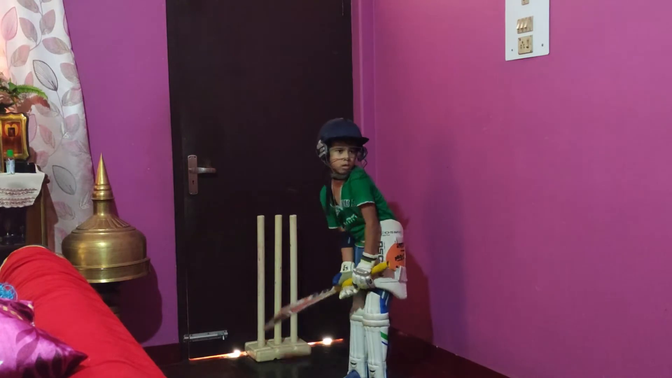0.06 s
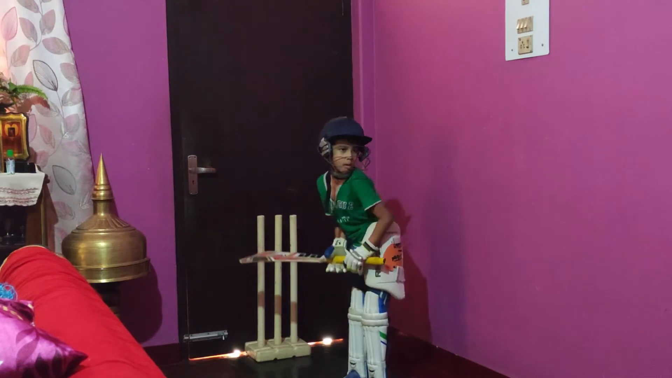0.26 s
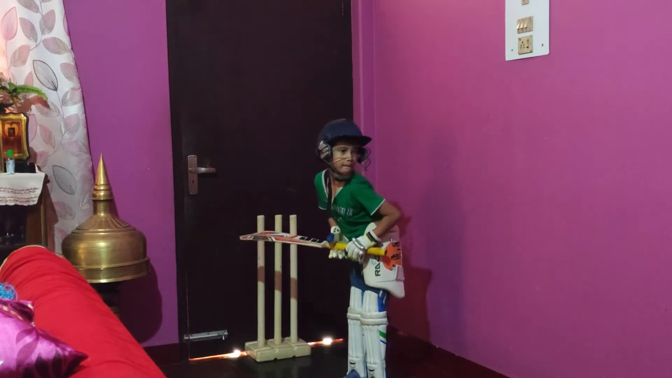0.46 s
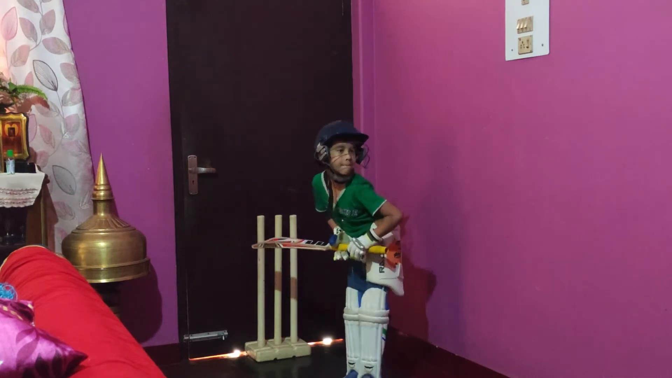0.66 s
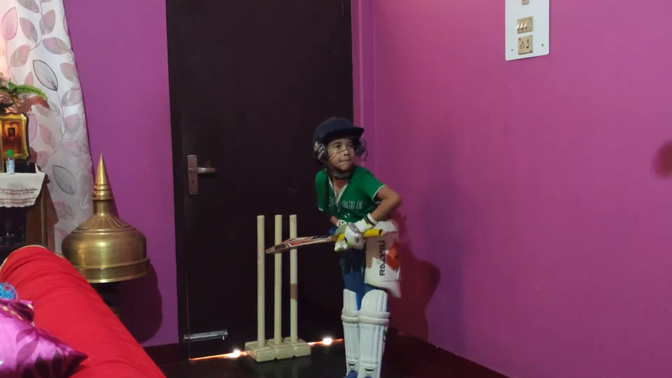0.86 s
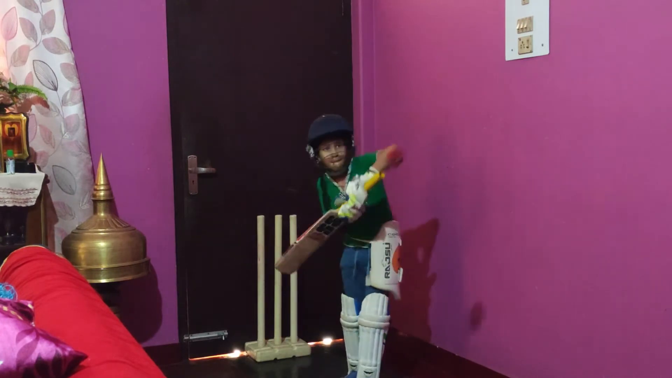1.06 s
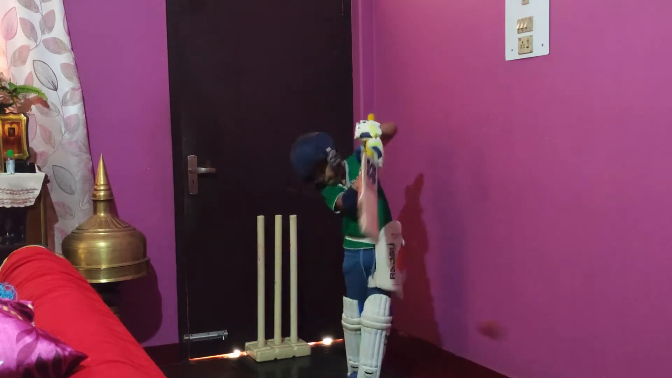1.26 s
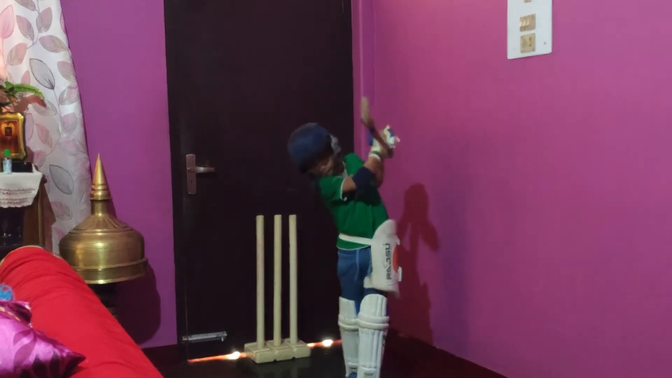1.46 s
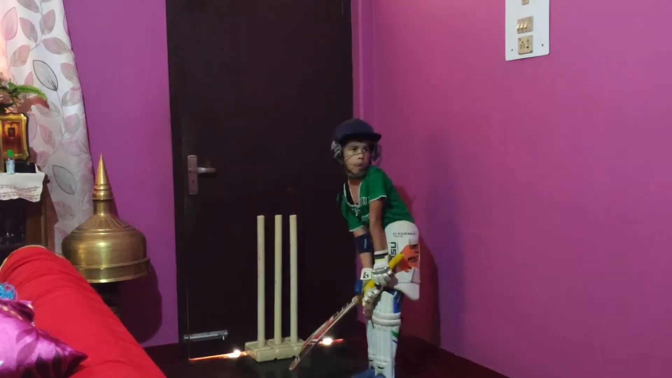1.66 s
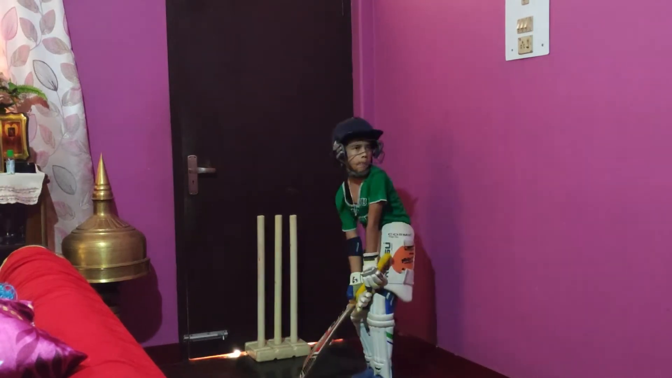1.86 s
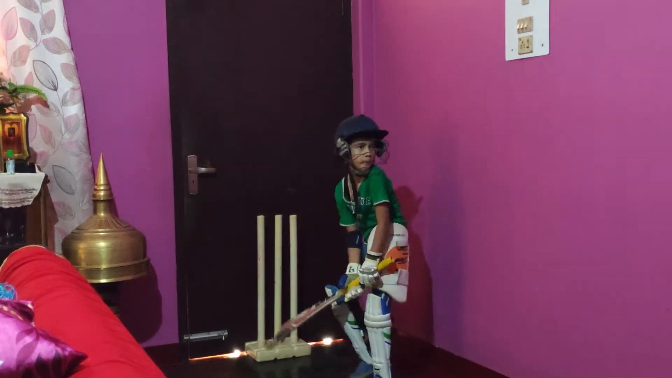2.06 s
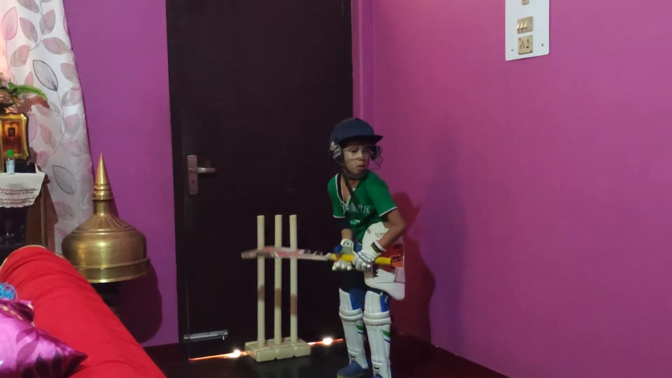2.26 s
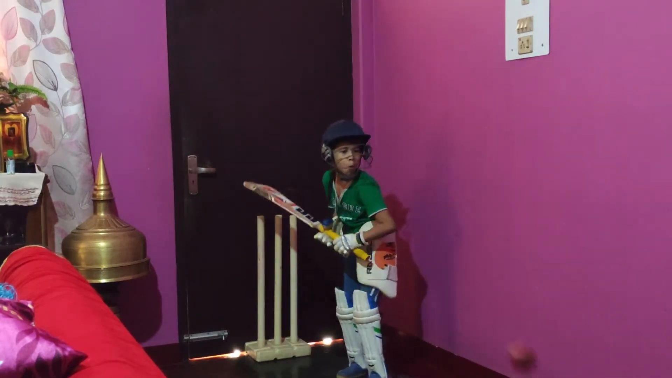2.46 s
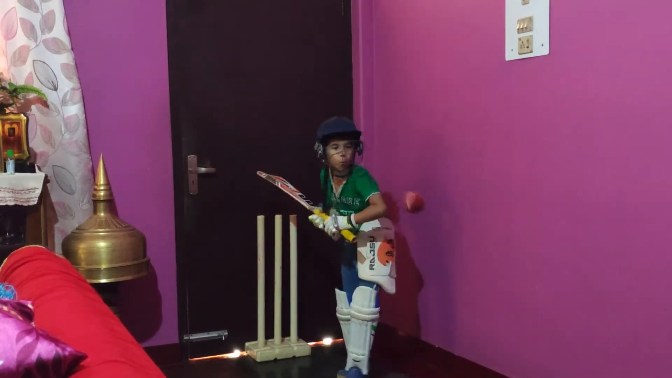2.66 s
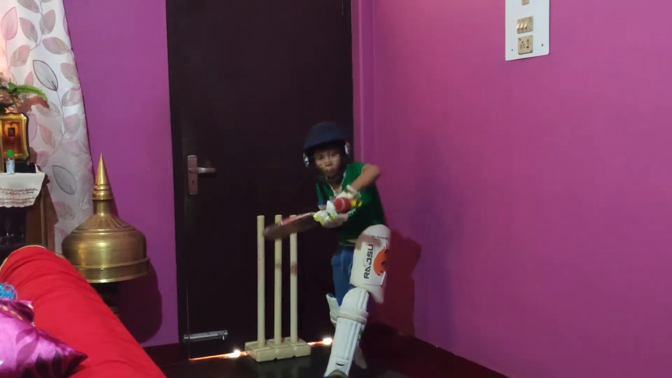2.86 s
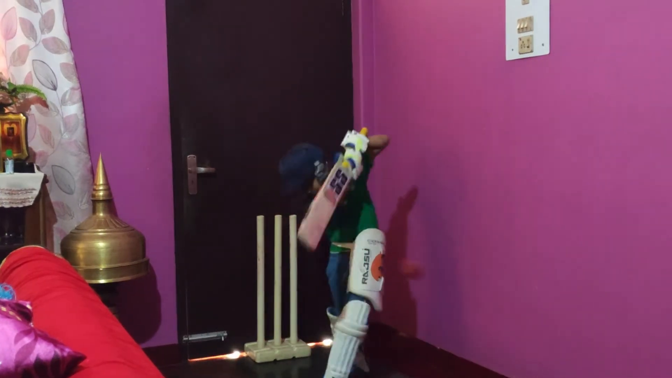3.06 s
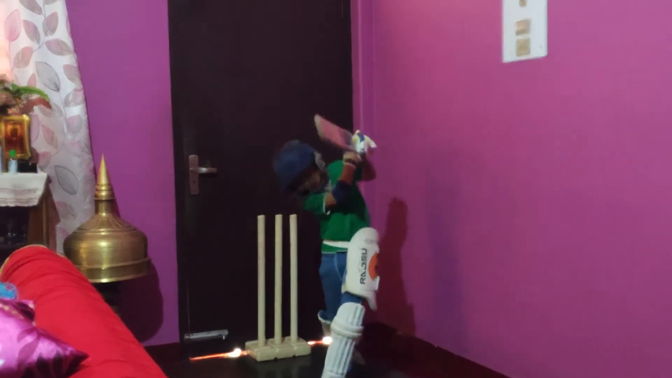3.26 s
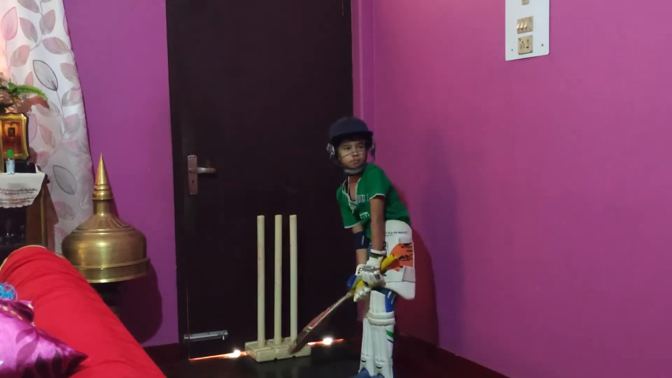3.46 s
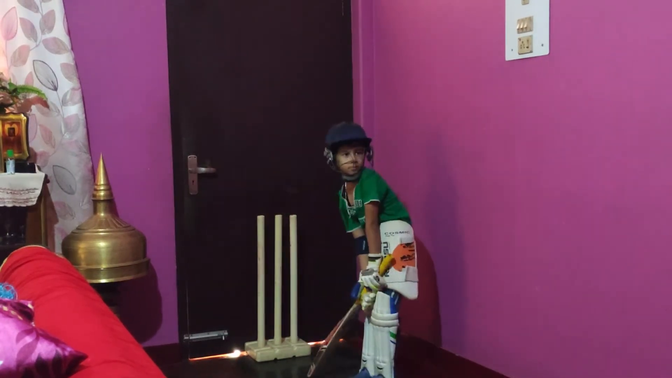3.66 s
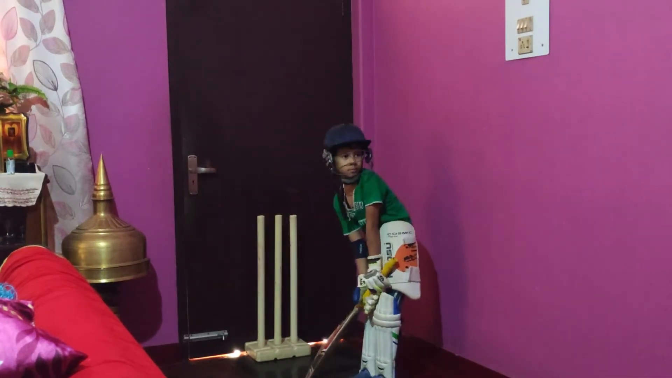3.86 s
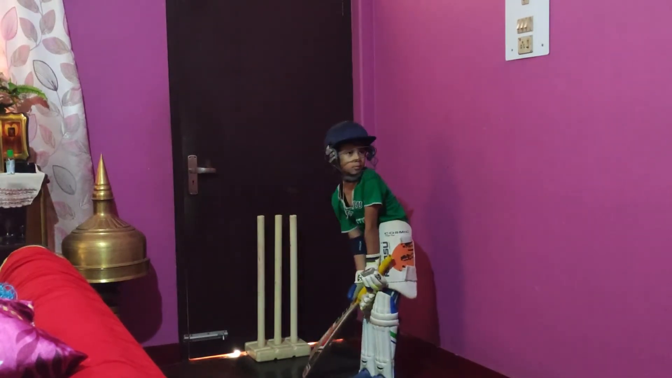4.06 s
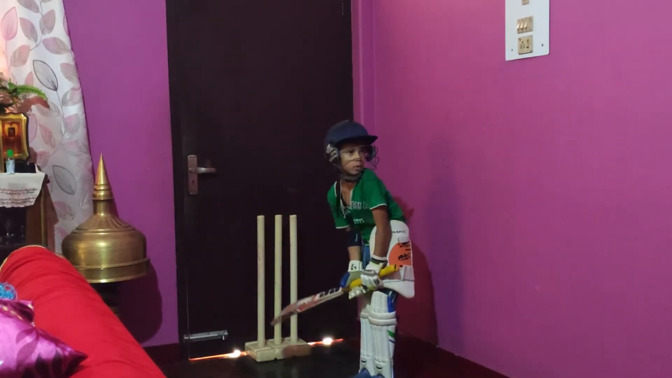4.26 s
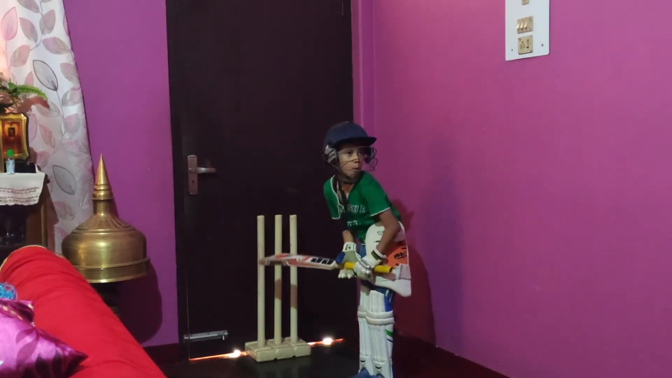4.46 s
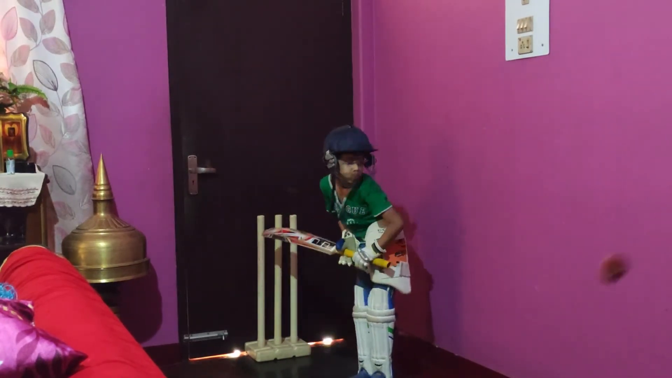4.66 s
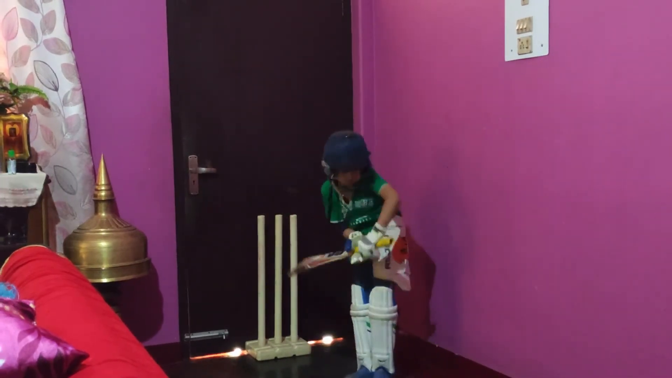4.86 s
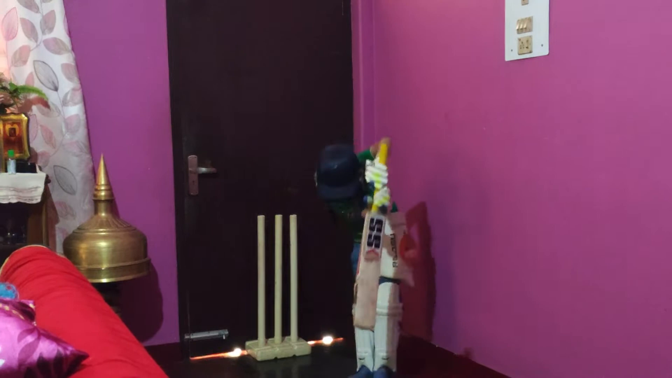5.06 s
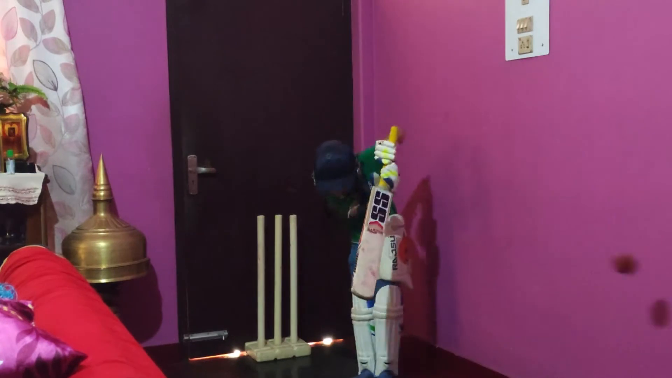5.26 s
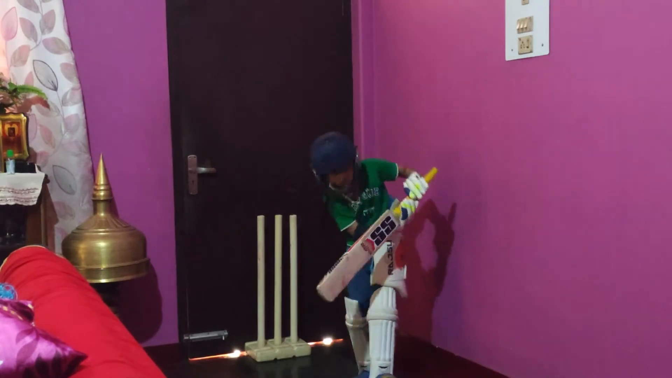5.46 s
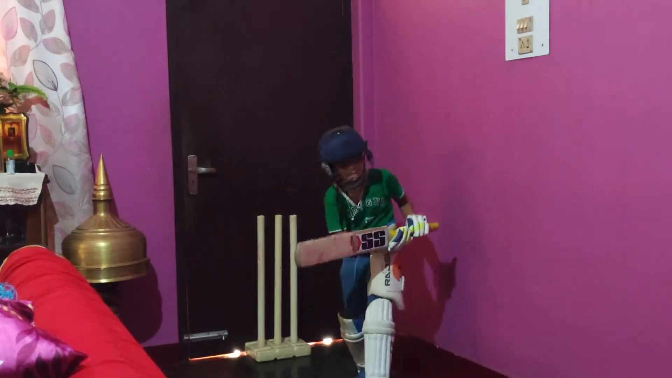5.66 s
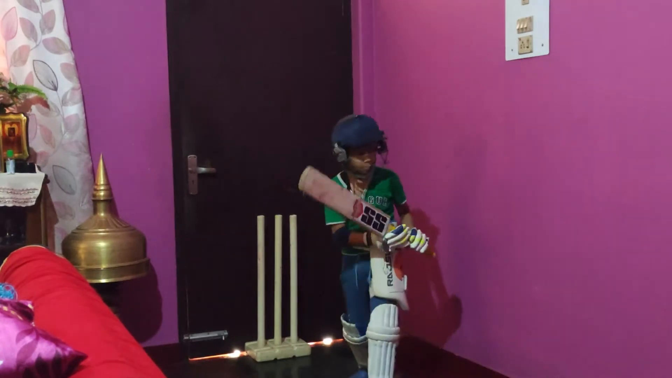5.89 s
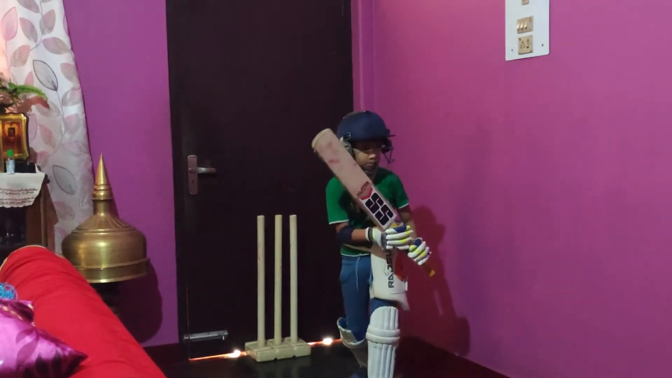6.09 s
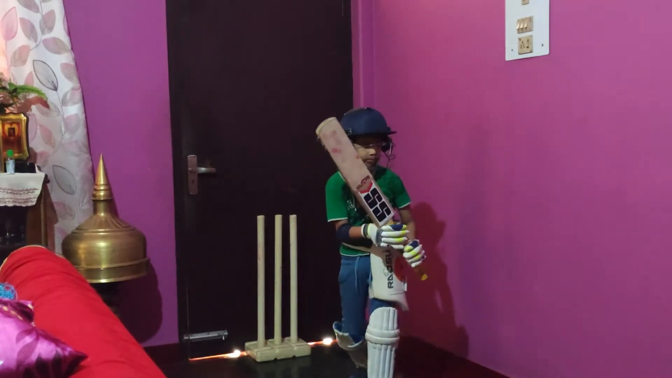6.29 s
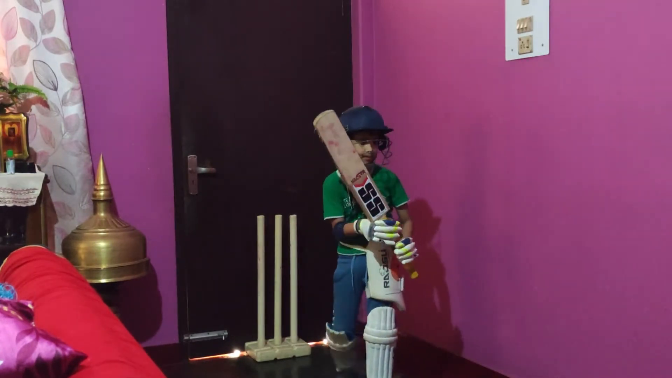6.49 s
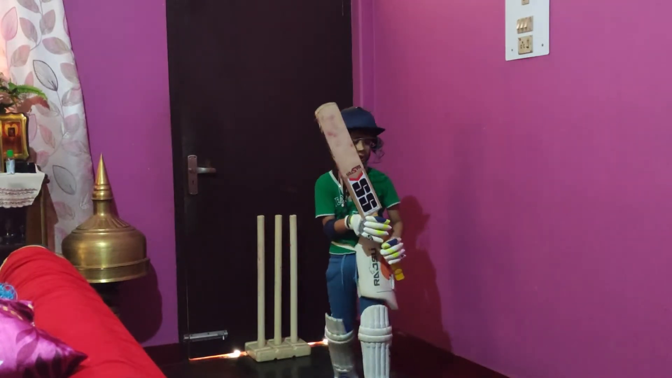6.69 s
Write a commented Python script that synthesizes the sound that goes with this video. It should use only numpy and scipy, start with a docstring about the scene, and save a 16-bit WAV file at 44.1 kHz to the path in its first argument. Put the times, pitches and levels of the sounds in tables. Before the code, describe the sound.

A small hard-walled room holds quiet, steady, low-weighted noise and a faint wavering hum. Clothes and pads rustle softly until a wooden bat cracks a ball sharply at 1.3 seconds, the loudest hit, ringing briefly with a short boxy echo. A tiny rasp of noise cuts off at 1.5, then the bat's toe knocks the floor firmly at 1.55 and more lightly at 1.9. A ball bounces at 2.4, and the second crack comes at 3.1. A faint gear tick precedes a hollow, chattering knock at 3.65 and a weaker one at 3.95. Another tick and a bounce at 4.9 lead to the third crack at 5.1, softer and fuller in bass. Pads rub hard as feet thud quickly around 5.55 to 5.6; a scuff at 5.95 and lighter steps near 6.1 follow. Faint rustling and a last scuff at 6.7 close it.

```python
"""A wooden bat cracks a ball three times in a small hard-walled room: shaped pulses ring the blade and room.
Thrown balls bounce; the toe of the bat knocks twice on the floor between strokes, its rebounds as a comb.
Feet land after the last stroke; light ticks of the gear use the same pulse model, without audible blade.
Clothes and pads rustle and soles scuff: noise with level envelopes. A brief burst of noise cuts off.
Below lie steady room noise and a low hum of two wavering sines."""
import sys
import numpy as np
from scipy import signal
from scipy.fft import rfft, irfft
from scipy.io import wavfile
from scipy.ndimage import uniform_filter1d

SR = 44100
rng = np.random.default_rng(int(sys.argv[2]) if len(sys.argv) > 2 else 0)


def store_pcm(level_fs):
    """Save levels as 16-bit WAV."""
    pcm = np.round(np.clip(level_fs, -1, 1) * 32767).astype(np.int16)
    wavfile.write(sys.argv[1], SR, np.atleast_2d(pcm).T)


N = 296793
TIME_S = np.arange(N) / SR
RESPONSE_SIZE = 65536  # samples
HZ = np.fft.rfftfreq(RESPONSE_SIZE, 1 / SR)
AGE_S = np.arange(RESPONSE_SIZE) / SR
SIDES = np.array([[.5], [-.5]])  # left, right: splits a left-minus-right difference
LEAD_S = 0.001  # margin ahead of the first path, so that a side can lead


def amp(db):
    """Decibels to amplitude gain."""
    return 10 ** (np.asarray(db) / 20)


def unit(x):
    """Scales to rms 1."""
    return x / np.sqrt(np.mean(x ** 2) + 1e-20)


def read(points, hz):
    """Interpolates a table on a log-frequency axis."""
    point_hz, value = np.transpose(points)
    return np.interp(np.log(hz + 1), np.log(point_hz + 1), value)


def add(mix, start_s, sound):
    """Mixes a stereo sound in at start_s, cut at the end of the mix."""
    part = mix[:, round(start_s * SR):][:, :sound.shape[1]]
    part += sound[:, :part.shape[1]]


def noise(colour, alike, size):
    """Stereo noise of rms 1; the mid/side balance at each frequency sets left-right likeness."""
    hz = np.fft.rfftfreq(size, 1 / SR)
    mid, side = rfft(rng.standard_normal((2, size)))
    likeness = np.clip(read(alike, hz), -1, 1)
    mid = mid * np.sqrt(1 + likeness)
    side = side * np.sqrt(1 - likeness)
    left_right = np.array([mid + side, mid - side])
    return unit(irfft(left_right * amp(read(colour, hz)), size))


def drift(top_hz):
    """Slow random wander of rms 1: ten sines at random rates up to top_hz."""
    rates_hz = top_hz * rng.uniform(0.074, 1, size=10)
    return unit(sum(np.sin(2 * np.pi * (hz * TIME_S + rng.random())) for hz in rates_hz))


# Colour of the room noise. Each row: frequency in Hz, relative spectral level in dB.
AIR_COLOUR = [(20, -2), (38, -8.5), (66, -9.5), (95, -15), (130, -10.5), (175, -2), (300, -8), (440, -14.5),
              (620, -10), (1500, -19), (3000, -28.5), (5200, -40), (7500, -34), (9500, -43), (15800, -45)]
# Likeness of the sides in room noise and rasp. Each row: frequency in Hz, correlation from -1 to 1.
AIR_ALIKE = [(50, 0.19), (120, 1), (290, .82), (640, 0.65), (1400, -0.038), (3100, -0.11), (6800, -0.051),
             (15000, 0.04)]
AIR_DB = -49.5  # rms


def room_noise():
    """Steady random noise with the colour of the room."""
    return amp(AIR_DB) * noise(AIR_COLOUR, AIR_ALIKE, N)


# Hum partials. Each row: frequency in Hz, rms level in dB about which it wavers.
HUM_PARTIALS = [(102.3, -58.5), (161.5, -64)]


def hum(waver_db=1.0, wander_rad=0.6):
    """Low sines, equal on both sides, whose level and phase wander at random."""
    total = np.zeros(N)
    for hz, db in HUM_PARTIALS:
        level = amp(db + waver_db * drift(9.0)) * np.sqrt(2)
        total += level * np.sin(2 * np.pi * hz * TIME_S + wander_rad * drift(2.0))
    return total


RISE_SHARE = 0.75  # a movement gathers in this share of its fall time


def swell(peak_s, level_db, attack_s, hold_s, release_s):
    """Power of one movement: exponential rise to peak_s, hold, exponential fall."""
    t = TIME_S - peak_s
    away = np.maximum(-t, 0) / attack_s + np.maximum(t - hold_s, 0) / release_s
    return (amp(level_db) * np.exp(-away)) ** 2


def movements(rows):
    """Summed power of brief movements that share one shape."""
    return sum(swell(peak_s, db, RISE_SHARE * fall_s, 0, fall_s) for peak_s, db, fall_s in rows)


# Likeness of the sides for gear, scuffs and room tail. Each row: frequency in Hz, correlation from -1 to 1.
DIFFUSE_ALIKE = [(100, 1), (250, 0.86), (600, 0.5), (1000, -0.2), (2000, 0.16), (15000, -0.13)]
# Soles scuffing as the batter straightens up.
# Each row: fastest moment in seconds, level in dB, fall to 1/e amplitude in seconds.
SCUFF_MOVES = [(5.95, -49, .05), (6.69, -50.5, .06)]
# Colour of a scuff. Each row: frequency in Hz, relative level in dB.
SCUFF_SPECTRUM = [(150, -27), (430, -6), (680, -1), (1000, -13), (2500, -23), (9000, -45)]


def scuffs():
    """Soles rub the floor twice: coloured noise follows the power of the movement."""
    return np.sqrt(movements(SCUFF_MOVES)) * noise(SCUFF_SPECTRUM, DIFFUSE_ALIKE, N)


# Clothes and pads as the batter lifts the bat, swings and shifts.
# Each row: fastest moment in seconds, level in dB before flutter, fall to 1/e amplitude in seconds.
RUSTLE_MOVES = [(.19, -60.5, 0.18), (.665, -56.5, .07), (.87, -59.5, 0.043), (1.19, -58.5, 0.099),
                (1.53, -49.5, .04), (2.66, -65, 0.14), (3.52, -58.5, .17), (4.085, -56, 0.036),
                (4.86, -64, 0.12), (5.44, -60, .025), (6.45, -65, .35)]
# Colour of the rustle. Each row: frequency in Hz, relative level in dB.
RUSTLE_SPECTRUM = [(100, -12), (500, -1), (1800, -1), (4000, -9), (7400, -8.5), (9500, -22.5), (15000, -27)]
FIDGET_DB = -68.5  # the gear is never quite still
# lunge after the last stroke: pads rub hard while the feet land, then settle
LUNGE_S, LUNGE_DB = 5.545, -49.5
LUNGE_ATTACK_S, LUNGE_HOLD_S, LUNGE_RELEASE_S = 0.047, 0.075, .2


def rustle(flutter_db=1.05):
    """Cloth and pads rub with each movement: fluttering noise with summed movement power."""
    lunge = swell(LUNGE_S, LUNGE_DB, LUNGE_ATTACK_S, LUNGE_HOLD_S, LUNGE_RELEASE_S)
    rubbing = np.sqrt(amp(FIDGET_DB) ** 2 + movements(RUSTLE_MOVES) + lunge)
    flutter = amp(flutter_db * drift(60))
    return rubbing * flutter * noise(RUSTLE_SPECTRUM, DIFFUSE_ALIKE, N)


# Colour of the rasp. Each row: frequency in Hz, relative level in dB.
RASP_SPECTRUM = [(40, -12), (200, 5), (700, -7), (1500, -8.5), (3000, -13.5), (5000, -13), (8000, -20),
                 (10500, -33), (15000, -34)]


def rasp(start_s=1.4852, end_s=1.509, level_db=-31, ramp_s=0.00036):
    """A brief burst of noise that cuts off: steady noise behind a gate with short ramps."""
    gate = np.clip(np.minimum(TIME_S - start_s, end_s - TIME_S) / ramp_s, 0, 1)
    return amp(level_db) * gate * noise(RASP_SPECTRUM, AIR_ALIKE, N)


def ringing(modes, flip=1):
    """Summed spectrum of damped modes, each weighted by a further factor flip."""
    total = 0
    for k, (hz, db, t60_s) in enumerate(modes):
        total = total + flip ** k * amp(db) / (1 + 2j * np.pi * (HZ - hz) * t60_s / np.log(1000))
    return total


# Decay of the diffuse tail. Each row: frequency in Hz, 60 dB decay time in seconds.
TAIL_T60 = [(80, 1), (210, 0.92), (400, 0.52), (700, 0.39), (1470, 0.41), (3900, 0.46), (7500, 0.37),
            (14000, 0.44)]


def diffuse_tail(early_db, build_s=0.0038, early_s=0.01):
    """Noise decaying at its own rate per frequency, flattened to spectral level 1."""
    hz, t, z = signal.stft(noise([(1, 0)], DIFFUSE_ALIKE, RESPONSE_SIZE), SR, nperseg=512)
    z = z * np.exp(-np.log(1000) * t / read(TAIL_T60, hz)[:, None])
    tail = signal.istft(z, SR)[1][:, :RESPONSE_SIZE]
    # scattering builds up quickly; early_db sets how the near walls stand out
    build = 1 - np.exp(-AGE_S / build_s)
    tail = rfft(tail * build * amp(early_db * np.exp(-AGE_S / early_s)))
    return tail / np.sqrt(uniform_filter1d((abs(tail) ** 2).mean(0), size=160) + 1e-12)


# Standing waves of the room.
# Each row: frequency in Hz, relative level in dB before the flip weighting, 60 dB decay time in seconds.
STANDING_WAVES = [(102.12, 8, 0.85), (136.4, -6, 0.72), (161.6, 2, 0.94), (184.05, 4, 0.82),
                  (237.6, 5.5, 1), (274.7, 7.5, 0.52), (325.5, 4.5, 0.67), (400, -0.5, 0.55),
                  (504, -2, 0.94), (580, -5, 0.21), (602, 6.5, 0.87), (730, -11, 1), (721.2, 3.5, 0.27)]


def room(paths, tail_db, modes_db, early_db, scatter_hz=1500, scatter_s=0.0022):
    """Response from one spot: direct path, single reflections, diffuse tail and standing waves."""
    tail = diffuse_tail(early_db)
    arrivals = []
    for delay_s, db, lag_s, pan_db in paths:
        delay = np.exp(-2j * np.pi * HZ * (delay_s + SIDES * lag_s + LEAD_S))
        arrivals.append(amp(db + SIDES * pan_db) * delay)
    direct, *echoes = arrivals
    # furniture and the batter's body smear the short waves of each reflection
    smear = rng.standard_normal((2, RESPONSE_SIZE)) * np.exp(-AGE_S / scatter_s)
    smear = rfft(smear / np.linalg.norm(smear, axis=1, keepdims=True))
    share = HZ / scatter_hz
    scattered = sum(echoes) * (1 + share * smear) / np.sqrt(1 + share ** 2)
    # neighbouring modes swing in opposite directions
    standing = ringing(STANDING_WAVES, flip=-0.962)
    return direct + scattered + amp(tail_db) * tail + amp(modes_db) * standing


# Modes of the wooden blade.
# Each row: frequency in Hz, relative level in dB before the random spread, 60 dB decay time in seconds.
BLADE_MODES = [(755, 1.5, 0.045), (1125, -41, 0.33), (1293, 1.5, 0.05), (1608, 1, 0.039),
               (1637, 14.5, 0.27), (1860, 11.5, 0.23), (2190, 1, 0.4), (2350, 9, 0.42), (2600, 3.5, 0.1),
               (3240, -16, 0.21), (3815, 11, 0.081), (5000, -3, 0.1), (5630, -19, .15)]


def blade(spread_db=4):
    """Each blow lands on a different point of the wood and wakes its modes unevenly."""
    return ringing([(hz, db + spread_db * rng.uniform(-1.7, 1), t60_s) for hz, db, t60_s in BLADE_MODES])


def causal(db):
    """Minimum-phase spectrum: the most compact causal pulse of this colour."""
    log_gain = np.log(amp(np.concatenate([db, db[-2:0:-1]])))
    return np.exp(np.conj(signal.hilbert(log_gain)))[:len(db)]


CHATTER_HZ = 726  # rebounds of the toe per second


def blow(colour, space, level_db, tilt_db, bass_db, ring_db=-100, spot_hz=1000, spot_db=0, octaves=1,
         chatter=0):
    """One contact pulse, tilted in colour, rings the blade and then the room."""
    shade_db = tilt_db * np.log2(1 + HZ / 1000) + bass_db / (1 + (HZ / 320) ** 4)
    shade_db += spot_db * np.exp(-(np.log2((HZ + 1) / spot_hz) / octaves) ** 2)
    pulse = -causal(read(colour, HZ) + shade_db) * (1 + amp(ring_db) * blade())
    # quick, dying rebounds repeat the sharp part of the pulse: a hollow comb in the treble
    rebound = np.clip(chatter, 0, .8) * HZ ** 4 / (HZ ** 4 + 1300 ** 4)
    pulse /= 1 - rebound * np.exp(-2j * np.pi * HZ / CHATTER_HZ)
    sound = irfft(pulse * space)[:, :SR]
    first_50ms_rms = np.sqrt(np.mean(sound[:, :SR // 20] ** 2))
    return amp(level_db) * sound / first_50ms_rms


def contacts(rows, colour, get_space):
    """Places one blow per row, each through the room response that get_space returns."""
    mix = np.zeros((2, N))
    for start_s, *settings in rows:
        add(mix, start_s - LEAD_S, blow(colour, get_space(), *settings))
    return mix


# First paths from the floor, shared by ticks, steps and knocks.
# Each row: delay in seconds, level in dB, lag of the left side in seconds, left minus right in dB.
FLOOR_PATHS = [(0, 1.5, 0.00034, -2), (.0018, 5.5, 0.00018, -2), (.0072, -3.5, 0.0012, -5.5),
               (.0120, -4, 0.0011, 4), (.0145, 3, 0, 2), (.0182, -6, 0.0073, -1), (.033, -22, .0003, 13)]


def floor_space():
    """A fresh room response for a light contact at the floor."""
    return room(FLOOR_PATHS, tail_db=14.5, modes_db=2, early_db=15)


# Light ticks of the gear.
# Each row: start in seconds, level in dB, treble tilt in dB per octave, bass in dB.
GEAR_TICKS = [(3.521, -52, 0, 0), (4.878, -51, 0, 0)]
# Colour of a tick. Each row: frequency in Hz, relative level in dB.
TICK_SPECTRUM = [(100, -20), (800, -6), (1450, 2), (2400, -14.5), (7000, -26), (14000, -40)]


def ticks():
    """Small pulses peaking in the middle range, heard through the room."""
    return contacts(GEAR_TICKS, TICK_SPECTRUM, floor_space)


# Feet on the floor.
# Each row: start in seconds, level in dB, treble tilt in dB per octave, bass in dB.
FOOT_LANDINGS = [(5.546, -35, 1, -2), (5.588, -35, -1, 2), (5.618, -39.5, -1, 3), (6.066, -43, 0, 0.43),
                 (6.088, -42, -0.86, 3), (6.135, -45, -1, 3)]
# Colour of a step. Each row: frequency in Hz, relative level in dB.
STEP_SPECTRUM = [(30, -5.5), (80, -1.5), (130, 3), (230, -2.5), (380, -15.5), (900, -22.5), (3000, -40),
                 (12000, -62)]


def steps():
    """Feet land as bass-heavy pulses, heard through the room."""
    return contacts(FOOT_LANDINGS, STEP_SPECTRUM, floor_space)


# Ball bouncing.
# Each row: start in seconds, level in dB, treble tilt in dB per octave, bass in dB.
BALL_BOUNCES = [(2.4121, -31.5, -1, -2.5), (4.9326, -30.5, 1, 5)]
# Colour of a bounce. Each row: frequency in Hz, relative level in dB.
BOUNCE_SPECTRUM = [(40, -24), (100, -4.5), (180, 1), (380, -8), (650, -9.5), (1000, -3), (1300, -4),
                   (1700, -10.5), (2200, -14), (4500, -26.5), (7500, -22.5), (9500, -37), (15000, -52)]
# First paths from the bounce.
# Each row: delay in seconds, level in dB, lag of the left side in seconds, left minus right in dB.
BOUNCE_PATHS = [(0, 2.5, .0001, -7), (.0021, -2, .0001, 7), (.0063, -3, .0002, -26.5),
                (.0126, -7, .0002, 8), (.0165, 4.5, -.0002, -3), (.0285, -3, .0002, 7)]


def bounces():
    """The ball bounces: pulses that stir the standing waves strongly."""
    return contacts(BALL_BOUNCES, BOUNCE_SPECTRUM,
                    lambda: room(BOUNCE_PATHS, tail_db=15.0, modes_db=21.5, early_db=-0.5))


# Toe of the bat on the floor.
# Each row: start in seconds, level in dB, treble tilt in dB per octave, bass in dB, ring of the blade in dB,
# pitch favoured by the struck spot in Hz, its emphasis in dB, its breadth in octaves, chatter from 0 to 1.
TOE_KNOCKS = [(1.5580, -20.5, -1.6, -3.5, -12, 860, 4.5, 0.58, 0.075),
              (1.9084, -27.5, 1.6, 1, -7, 1150, 4.6, 0.29, 0.054),
              (3.6607, -22.5, 1.15, -1, -25, 750, 3.9, 0.64, 0.56),
              (3.9640, -30, -0.8, 3, -9, 1450, 3.5, 0.46, 0.13)]
# Colour of a knock. Each row: frequency in Hz, relative level in dB.
KNOCK_SPECTRUM = [(60, -32.5), (92, -4), (125, -6), (185, -0.5), (400, -3.5), (750, -6), (1100, -13),
                  (1600, -19.5), (2200, -26), (4200, -37), (7500, -41.5), (9500, -56.5), (15000, -65)]


def knocks():
    """The toe lands on one spot with quick rebounds; all knocks share one room response."""
    crease = room(FLOOR_PATHS, tail_db=11, modes_db=15.5, early_db=2.5)
    return contacts(TOE_KNOCKS, KNOCK_SPECTRUM, lambda: crease)


# Bat on ball.
# Each row: start in seconds, level in dB, treble tilt in dB per octave, bass in dB, ring of the blade in dB,
# pitch favoured by the struck spot in Hz, its emphasis in dB, its breadth in octaves.
BAT_STROKES = [(1.2750, -19.5, 0.6, -2.5, -10, 1460, 7, 0.6), (3.0960, -22.8, .5, 1, -7, 1150, 4.5, 0.9),
               (5.1095, -24.5, -0.3, 5.5, -3, 1900, 11, 1.85)]
# Colour of a stroke. Each row: frequency in Hz, relative level in dB.
STROKE_SPECTRUM = [(40, -11), (90, 1), (250, 2.5), (420, -4), (600, -7), (850, -1.5), (1600, -4.5),
                   (2600, -7), (4500, -15), (7500, -11), (9500, -28.5), (15000, -42)]
# First paths from the bat.
# Each row: delay in seconds, level in dB, lag of the left side in seconds, left minus right in dB.
BAT_PATHS = [(0, 0, 0, -.5), (.0024, 0, .0001, -14), (.0076, 2.5, .0001, 2), (.0098, -1, -.0002, -7),
             (.0134, -8, 0, 2), (.0175, -5, .0003, 2), (.0287, -23, -.0002, 4)]


def strokes():
    """The ball cracks off the bat: a pulse rings the blade, with a fresh room response each time."""
    return contacts(BAT_STROKES, STROKE_SPECTRUM,
                    lambda: room(BAT_PATHS, tail_db=12.5, modes_db=16.5, early_db=8.0))


def scene():
    """Sums all layers."""
    background = room_noise() + hum()
    noises = rustle() + scuffs() + rasp()
    impacts = ticks() + steps() + bounces() + knocks() + strokes()
    return background + noises + impacts


# Balance of the two microphone ports. Each row: frequency in Hz, left minus right in dB.
PORT_BALANCE = [(100, 1.5), (380, 0.5), (700, 1.5), (1300, 0.3), (2400, -0.6), (4400, -3), (6500, -1.5),
                (8500, 4), (12500, -3), (15500, -3)]
EDGE_HZ = 15900


def record(dry):
    """Two microphone ports of slightly different colour, then a low-pass band limit."""
    balance_db = read(PORT_BALANCE, np.fft.rfftfreq(N, 1 / SR)) * SIDES
    heard = irfft(rfft(dry) * amp(balance_db), N)
    low_pass = signal.firwin(511, EDGE_HZ, window=("kaiser", 9), fs=SR)
    return signal.oaconvolve(heard, low_pass[None], "same")


dry = scene()
out = record(dry)
store_pcm(out)
```